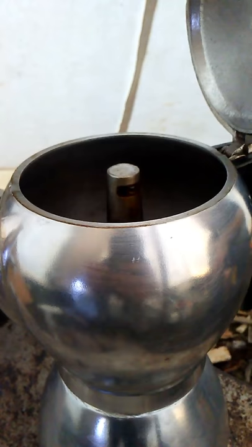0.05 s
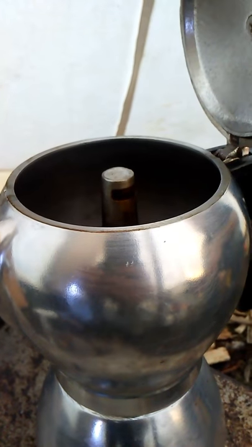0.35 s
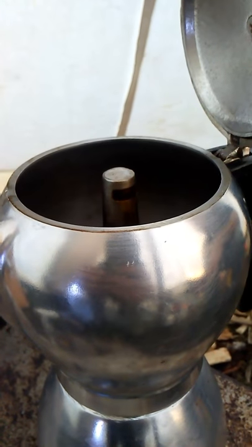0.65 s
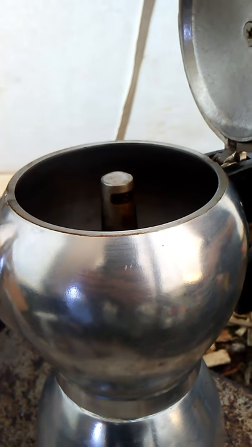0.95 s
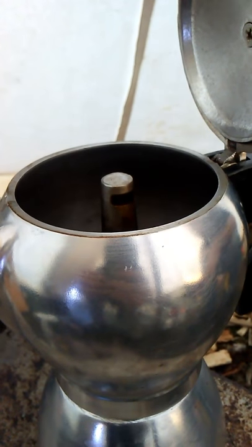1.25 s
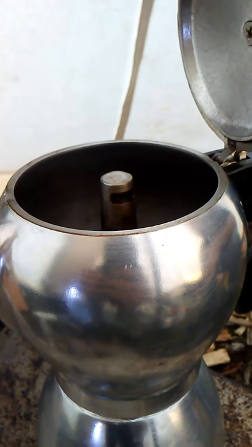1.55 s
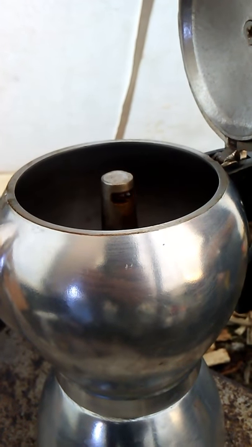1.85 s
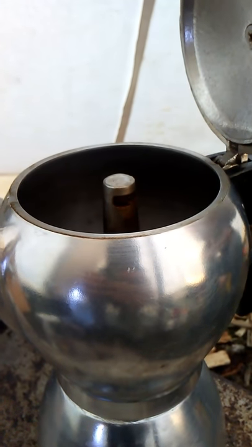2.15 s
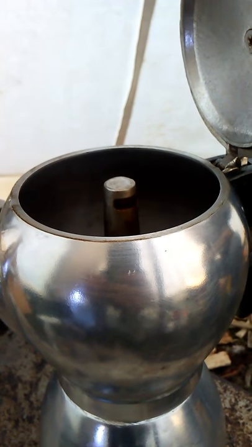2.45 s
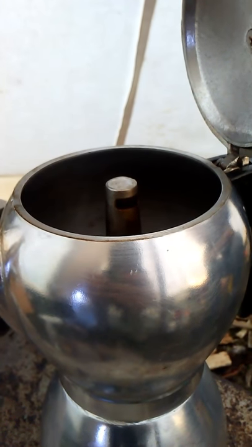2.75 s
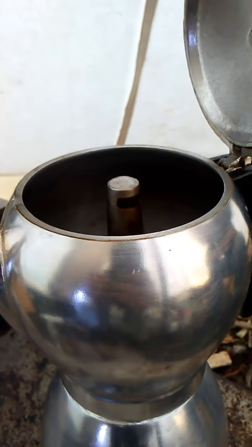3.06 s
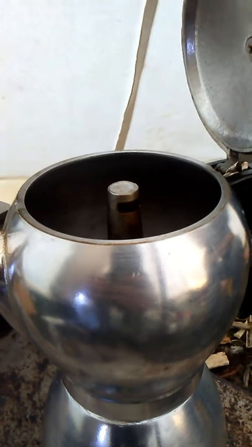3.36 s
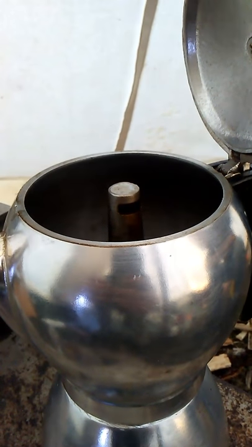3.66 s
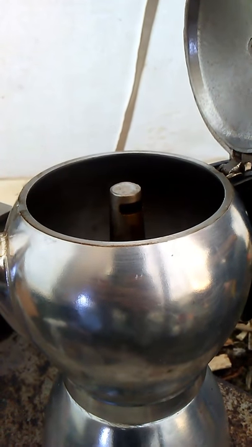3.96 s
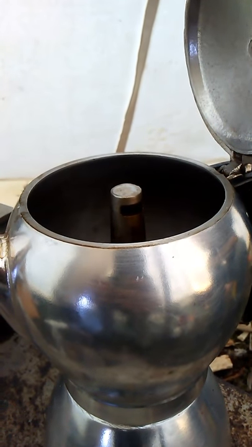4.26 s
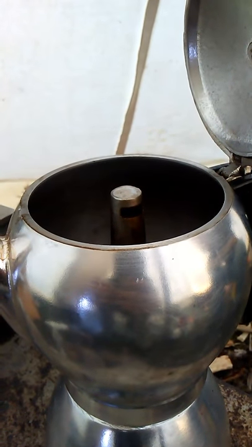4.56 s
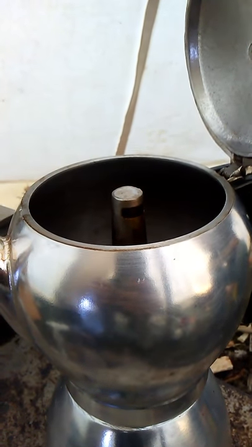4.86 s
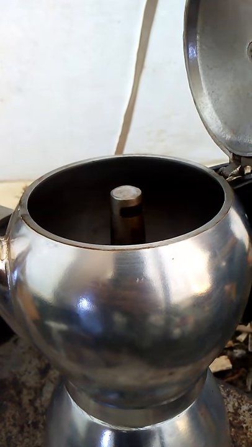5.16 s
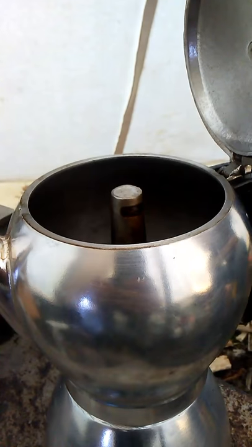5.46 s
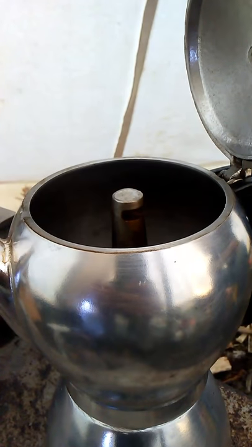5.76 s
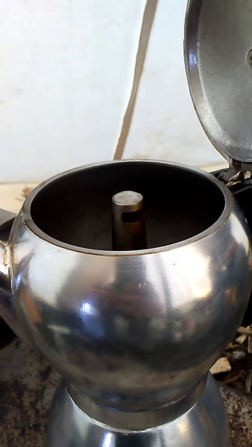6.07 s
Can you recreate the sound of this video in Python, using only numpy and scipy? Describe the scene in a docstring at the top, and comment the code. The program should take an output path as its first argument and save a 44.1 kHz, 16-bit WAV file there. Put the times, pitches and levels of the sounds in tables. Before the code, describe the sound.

A wood fire burns in a small metal stove in a tent, heard close up with almost no echo. Throughout, logs give dry, bright, irregular snaps with a very short ring, among tiny charcoal ticks. Beneath them, flames make a quiet low rumble and hollow burble that flutter in short swells, and moisture hisses faintly from the wood. Sharp snaps stand out at about 0.3, 0.6 and 0.8 seconds. Around 2 seconds a brief, faint jet of sap sputters, with more snaps at 2.1 and 2.4. At 2.8 seconds gas catches with a soft whump that falls in pitch. Lighter crackling follows until 4.4 seconds, when one big pop cracks and thumps the stove's body. Two hard snaps come at 4.6 and 5 seconds, then smaller crackles and the rumble continue to the end at about 6 seconds.

```python
"""Wood stove in a tent

A fire burns in a small metal stove, heard from beside the coffee pot on its top. Splitting logs snap,
charcoal ticks, and one big pop of bursting steam thumps the whole stove. Underneath, flames rumble and
burble in the firebox, and a pocket of gas lights with a soft whump. Moisture hisses gently out of the
wood, with one short jet of boiling sap."""
import sys
import numpy as np
from scipy import signal
from scipy.fft import rfft, irfft, next_fast_len
from scipy.io import wavfile
from scipy.ndimage import uniform_filter1d, map_coordinates

SR = 44100
rng = np.random.default_rng(int(sys.argv[2]) if len(sys.argv) > 2 else 0)


def persist_wave(psi):
    """Save psi, clipped to +-1, as 16-bit WAV."""
    counts = np.round(np.clip(psi, -1, 1) * 32767).astype(np.int16)
    wavfile.write(sys.argv[1], SR, np.atleast_2d(counts).T)


N = 269451

# The logs splitting. Each row: start in seconds, drive of the bright band in dB, then body, edge and
# sizzle in dB against that band, splinter pitch in Hz.
LOG_SNAPS = [(0.0054, -42.5, -14, 0.5, -1, 11900), (0.071, -55.5, -26, -11, -2, 9840),
             (0.1112, -47.5, -11, -5, -2, 2570), (0.1769, -46.5, -14, -15.5, -4, 2250),
             (0.2374, -46, -37, -13, -4, 8500), (0.2779, -29, -10, -2.5, -5.5, 11600),
             (0.456, -56.5, -30, -6, -7, 8350), (0.6055, -24.5, -7.5, -10, -5, 10800),
             (0.7475, -54, 4.5, 6.5, 2, 2740), (0.7851, -34.5, -7.5, 1.5, -14, 9850),
             (0.9917, -52.5, -26, -10, 0, 9650), (1.2097, -45, -9.5, 1.5, -4, 9350),
             (1.7094, -57.5, -20, -27, 3, 9900), (1.8268, -59, -20, -13, -1, 11220),
             (1.859, -56, -18, -18, -6, 7500), (1.8734, -51.5, -19, -8, 2, 9350),
             (1.927, -47, -28, -21, -15, 8700), (2.012, -44, -22, -13, -6, 9450),
             (2.1497, -34, -6, 0.5, -4, 3120), (2.4208, -56.5, 5, 10, 7, 2760),
             (2.4445, -50, -7, -8, 3, 9560), (2.448, -32, -1, 4, -1.5, 9330),
             (2.6543, -47.5, -25, -13, -6, 4750), (2.7003, -41.5, -1, 4, 3.5, 4340),
             (2.8884, -48, -34, -30, -24, 9500), (3.007, -44, -35, -3.5, -1, 9650),
             (3.374, -43.5, -29, -6, -2, 8400), (3.5357, -44, -33, -16.5, -2, 9100),
             (3.6804, -52, 4, 5, 2, 9400), (4.2002, -48, -20, -20, -8, 9800),
             (4.242, -55, -29, -15, -4, 8800), (4.435, -44.5, -12, -18, -4, 2520),
             (4.4932, -62.5, 6, 8, 4, 4910), (4.6486, -25.5, -17, -8, -4.5, 9600),
             (4.777, -39, -5.5, -7, -10, 5740), (4.9183, -36.5, -34, -6.5, -5, 5900),
             (5.0335, -37, -19, -20, -1, 8790), (5.038, -21.5, -8.5, -5, -9.5, 8600),
             (5.456, -52.5, 1, 4.5, 0, 2680), (5.8685, -40.5, -9, -3, 1, 9200),
             (6.031, -56, -13, -15, -10, 8400)]
# A snap's five tone bands. Centres in Hz of knock, body, edge, bright and sizzle.
SNAP_BANDS_HZ = (750, 2300, 5200, 9200, 13500)
# The big pop's crack. Drive in dB of the same five bands.
POP_TONE_DB = [-20, -25, -24, -23.5, -34]
# The metal shell's resonances and hollows. Each row: centre in Hz, width in Hz, lift in dB.
STOVE_SHELL = [(450, 160, -9), (780, 110, 4), (1480, 350, -6), (1900, 220, 4), (2220, 260, 5),
               (2950, 330, 9), (3750, 700, -12), (4750, 300, 4), (5770, 250, 6), (8900, 500, 3),
               (10080, 350, 2)]
# The stove's modes under a heavy blow. Each row: pitch in Hz, relative level in dB, T60 in seconds.
THUMP_MODES = [(75, -16, .09), (125, -9, .06), (170, -6, .09), (226, -2, .055), (282, -5, .075),
               (325, -16, .06), (600, -12, .05), (775, -9, .06), (895, -14, .05), (1830, -13, .05),
               (1980, -14, .045), (2190, -12, .045), (2290, -13, .045), (2450, -15, .045), (5760, -15, .05)]
# Short swells of low rumble and burble, some just after a snap. Each row: start in seconds, length in
# seconds, rumble and burble in dB before trim.
LOW_SWELLS = [(0.064, 0.055, -52, -67.5), (0.265, .11, -43.5, -59), (0.66, 0.046, -47, -60),
              (0.782, 0.036, -49.5, -81), (0.885, 0.028, -54, -61), (0.961, .06, -49, -58.5),
              (1.074, 0.058, -56.5, -59.5), (1.327, 0.057, -45.5, -56.5), (1.497, 0.036, -48, -62),
              (1.682, 0.078, -52, -62.5), (1.834, 0.071, -58, -65), (1.944, .13, -44.5, -58),
              (2.156, 0.047, -48, -61.5), (2.475, 0.06, -45.5, -60.5), (2.589, 0.11, -47.5, -64),
              (2.783, 0.023, -52, -57), (2.872, 0.072, -50, -68), (3.06, 0.082, -43, -56),
              (3.274, 0.082, -50, -59), (3.532, 0.074, -51, -80), (3.648, 0.057, -54, -60),
              (3.831, 0.075, -48.5, -62), (3.94, 0.059, -47, -67), (4.072, .14, -50.5, -61.5),
              (4.251, 0.038, -48, -60), (4.457, 0.15, -47.5, -61), (4.696, 0.057, -56, -66.5),
              (4.81, 0.036, -48.5, -74), (5.055, 0.052, -47, -65), (5.286, .11, -49.5, -61),
              (5.465, 0.064, -64, -62.5), (5.571, 0.044, -52, -63.5), (5.824, 0.11, -45, -59),
              (5.947, .12, -44, -54.5)]
# The steady burn under the swells. Each row: time in seconds, level in dB before trim.
STEADY_BURN = [(0.0, -57.5), (2.35, -56.5), (3.08, -52.5), (3.59, -59.5), (4.12, -53), (4.61, -58),
               (4.92, -61.5), (5.62, -59), (6.11, -48)]
# The flames' low and hollow voices. Each row: frequency in Hz, relative level in dB.
RUMBLE_EQ = [(20, -20), (37, -4.5), (50, -11.5), (65, 0), (110, -2), (172, 1), (190, -4.5), (260, -11),
             (330, -27.5), (600, -43.5)]
BURBLE_EQ = [(200, -25), (340, -5), (480, -4), (700, -3), (950, -3), (1080, -13), (1350, -26), (3000, -50)]
# Air resonating in the firebox. Each row: centre in Hz, width in Hz, lift in dB.
FIREBOX_AIR = [(382.4, 29, 13), (441.7, 35, 10.5), (553.2, 13, 12.5), (684, 28, 7), (780, 50, 0),
               (891.4, 81, 8.5)]
# The rise and fall of the steam. Each row: time in seconds, level in dB before trim.
HISS_FADER = [(0.0, -64.5), (0.32, -69), (0.57, -69), (0.83, -65), (1.17, -71.5), (2.37, -67.5),
              (2.46, -64), (3.5, -68), (4.1, -69.5), (4.19, -67.5), (4.91, -66), (5.08, -62.5),
              (5.29, -70.5), (5.52, -64), (5.7, -71), (6.1, -65.5)]
# The tone of the steam and of the sap jet. Each row: frequency in Hz, relative level in dB.
HISS_EQ = [(500, 5), (1500, 1), (2400, -4), (2900, -3.5), (3500, 0), (4600, -4), (6000, -2), (7000, -3),
           (9300, 0), (11000, -3.5), (15500, 0)]
JET_EQ = [(800, -9), (1800, -6), (3800, -11), (7000, -9), (8600, -5.5), (9500, -6), (10400, -7),
          (15500, -28)]

TOP_HZ = 15800


def log_snaps(middling_db=-42.5):
    """Logs split: deep cracks have body, knock and ring on, surface splinters are thin and dry."""
    track = np.zeros(N)
    for start_s, drive_db, body_db, edge_db, sizzle_db, pitch_hz in LOG_SNAPS:
        knock_db = body_db - 5.5
        # the harder the snap, the more its attack stands out of the ring
        ring_db = 5 + .33 * body_db - .24 * (drive_db - middling_db)
        bands_db = drive_db + np.array([knock_db, body_db, edge_db, 0, sizzle_db])
        add(track, start_s, fracture(bands_db, ring_db, pitch_hz))
    return track


def fracture(bands_db, ring_db, pitch_hz, attack_t60=.027, ring_t60=.062, tent_t60=.3, trim_db=-2):
    """One break in the wood: a spike, a rattle of reflections, the firebox's ring, a faint tent tail."""
    t = np.arange(SR // 4) / SR
    spike = 1 + np.exp(-t / .0008)
    attack = spike * amp(-60 * t / attack_t60)
    ring = amp(ring_db - 60 * t / ring_t60) * (1 - np.exp(-t / .0078))
    near, far = rng.standard_normal((2, len(t)))
    # canvas soaks up treble, so the tent's answer is duller
    tent = signal.lfilter([.5], [1, -.5], far) * amp(ring_db - 22 - 60 * t / tent_t60)
    burst = near * np.hypot(attack, ring) + tent
    burst /= np.sqrt(np.mean(burst[t < .021] ** 2))  # levelled on its first 21 ms
    knock, _, _, bright, sizzle = bands_db
    top_db = sizzle + .4 * (sizzle - bright)  # a dull snap keeps falling through the top treble
    tone = [(100, knock - 12), *zip(SNAP_BANDS_HZ, bands_db), (TOP_HZ, top_db)]
    # the splinter that breaks off rings at its own pitch, inside the stove's resonances
    resonances = [*STOVE_SHELL, (pitch_hz, .08 * pitch_hz, 6.5)]
    return struck(burst, lambda hz: eq_db(tone, hz) + resonance_db(resonances, hz) + trim_db)


def big_pop(start_s=4.3885, thump_db=-21, attack_s=.00036, lag_s=.0008):
    """A pocket of steam bursts: the log cracks, and just after it the stove's air and walls thump."""
    t, track = np.arange(SR // 2) / SR, np.zeros(N)
    ring = sum(amp(db - 60 * t / t60) * np.sin(2 * np.pi * hz * t) for hz, db, t60 in THUMP_MODES)
    add(track, start_s - lag_s, fracture(POP_TONE_DB, ring_db=.5, pitch_hz=2300))
    add(track, start_s, amp(thump_db) * ring * (1 - np.exp(-t / attack_s)))
    return track


def flames(rumble_trim_db=-1, burble_trim_db=-.9):
    """Flames burn in the draught: a low rumble and a hollow firebox burble, both with short swells."""
    burn = amp(fader(STEADY_BURN))
    rumble_power = (burn * amp(-.5)) ** 2
    burble_power = (burn * amp(-12.5)) ** 2
    for start_s, length_s, rumble_db, burble_db in LOW_SWELLS:
        swell = surge(start_s, length_s, attack_s=.018, release_s=.024)
        rumble_power += (swell * amp(rumble_db + rumble_trim_db)) ** 2
        burble_power += (swell * amp(burble_db + burble_trim_db)) ** 2
    flicker = wobble(45)  # shared, so both voices flutter together
    rumble = noise(lambda hz: eq_db(RUMBLE_EQ, hz)) * amp(2.17 * flicker)
    hollow = noise(lambda hz: eq_db(BURBLE_EQ, hz) + resonance_db(FIREBOX_AIR, hz))
    burble = patchy(hollow, depth_db=4) * amp(1.17 * flicker + .98 * wobble(22))
    return np.sqrt(rumble_power) * unit_rms(rumble) + np.sqrt(burble_power) * unit_rms(burble)


def gas_puff(start_s=2.8, peak_db=-31, start_hz=160, end_hz=85, swell_s=.013):
    """A pocket of gas catches light: a soft whump that falls in pitch."""
    t, track = np.arange(SR // 8) / SR, np.zeros(N)
    hz = end_hz + (start_hz - end_hz) * np.exp(-t / .036)
    swell = (t / swell_s * np.exp(1 - t / swell_s)) ** 2
    add(track, start_s, amp(peak_db) * swell * np.sin(2 * np.pi * np.cumsum(hz) / SR))
    return track


def embers(count=120, softest_db=-68):
    """Charcoal gives tiny, bright, dry ticks at random moments."""
    track = np.zeros(N)
    for when, size, depth, pitch in rng.random((count, 4)):
        drive_db = softest_db + 2 * min(-np.log(1 - size), 3)  # mostly faint, a few up to 6 dB louder
        bands_db = drive_db + np.array([-25, -22 + 10 * depth, -16 + 9 * depth, 0, -4])
        add(track, when * N / SR, fracture(bands_db, ring_db=-20, pitch_hz=7000 + 6000 * pitch))
    return track


def steam(hiss_trim_db=.85, jet_db=-59.5):
    """Moisture hisses out of the logs; for a moment boiling sap sputters out in a jet."""
    hiss = noise(lambda hz: eq_db(HISS_EQ, hz) + .5 * resonance_db(STOVE_SHELL, hz))
    jet = noise(lambda hz: eq_db(JET_EQ, hz) + .5 * resonance_db(STOVE_SHELL, hz))
    waver_db, sputter_db = .9 * wobble(35), 1.8 * wobble(200)
    hiss *= amp(fader(HISS_FADER) + hiss_trim_db + waver_db)
    spurt = surge(start_s=1.985, length_s=.12, attack_s=.094, release_s=.14)
    return hiss + spurt * amp(jet_db + sputter_db) * jet


def surge(start_s, length_s, attack_s, release_s):
    """Envelope of a short swell: it rises around its start, holds, then dies away."""
    t = np.arange(N) / SR - start_s
    return np.clip(.5 + t / attack_s, 0, 1) * np.exp(-np.maximum(t - length_s, 0) / release_s)


def patchy(x, depth_db, size=1024):
    """Give noise short blotches of random gain, each about 100 Hz wide and 30 ms long."""
    frames = dict(nperseg=size, noverlap=size * 3 // 4)
    spectra = signal.stft(x, **frames)[2]
    blotches = uniform_filter1d(rng.standard_normal(spectra.shape), size=3, axis=0)
    blotches = uniform_filter1d(blotches, size=5, axis=1)
    return signal.istft(spectra * amp(depth_db * unit_rms(blotches)), **frames)[1][:N]


def amp(db):
    """Decibels to gain."""
    return 10 ** (np.asarray(db) / 20)


def unit_rms(x):
    """x levelled to rms 1."""
    return x / np.sqrt(np.mean(x ** 2) + 1e-20)


def eq_db(points, hz):
    """An EQ curve through (Hz, dB) points on a log frequency axis."""
    points_hz, points_db = np.transpose(points)
    return np.interp(np.log(hz + 1), np.log(points_hz + 1), points_db)


def resonance_db(modes, hz):
    """The lift in dB that a set of resonances gives each frequency."""
    return sum(db / (1 + (2 * (hz - centre) / width) ** 2) for centre, width, db in modes)


def fader(rows):
    """A fader ride through (seconds, dB) points, one value per sample."""
    return np.interp(np.arange(N) / SR, *np.transpose(rows))


def wobble(rate):
    """A smooth random curve, rate knots a second."""
    return map_coordinates(rng.standard_normal(int(N * rate / SR) + 4), [np.arange(N) * rate / SR])


def filtered(x, response):
    """x shaped by a gain for each frequency."""
    size = next_fast_len(N + 8192)
    return irfft(rfft(x, size) * response(np.fft.rfftfreq(size, 1 / SR)), size)[:N]


def noise(colour_db):
    """Noise of rms 1 with the given colour."""
    return unit_rms(filtered(rng.standard_normal(N), lambda hz: amp(colour_db(hz))))


def struck(x, colour_db, size=16384):
    """x through a minimum-phase EQ, so that nothing sounds before the blow."""
    cepstrum = irfft(np.log(amp(colour_db(np.fft.rfftfreq(size, 1 / SR)))))
    cepstrum[1:size // 2] *= 2
    cepstrum[size // 2 + 1:] = 0
    return irfft(rfft(x, size) * np.exp(rfft(cepstrum)))


def add(track, start_s, sound):
    """Mix a sound into the track at its cue."""
    start = int(np.clip(round(start_s * SR), 0, N - 1))
    track[start:start + len(sound)] += sound[:N - start]


def scene():
    """The mono mix: crackle up front, over a bed of flames and steam."""
    return (log_snaps() + embers() + big_pop() + gas_puff() + flames() + steam())[None]


def record(dry):
    """A 48 Hz low cut clears the deepest bass, and a steep high cut takes off the very top."""
    low_cut = signal.butter(N=4, Wn=48, btype="high", fs=SR, output="sos")
    thinned = signal.sosfilt(low_cut, dry[0])
    return filtered(thinned, lambda hz: 1 / np.sqrt(1 + (hz / TOP_HZ) ** 200))[None]


dry = scene()
out = record(dry)
persist_wave(out)
```